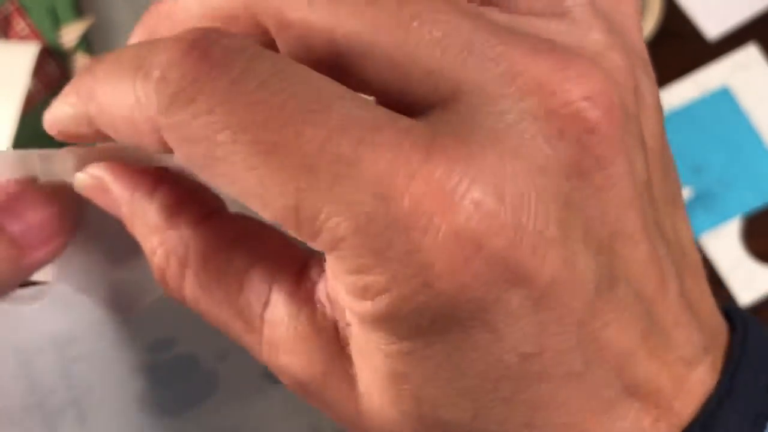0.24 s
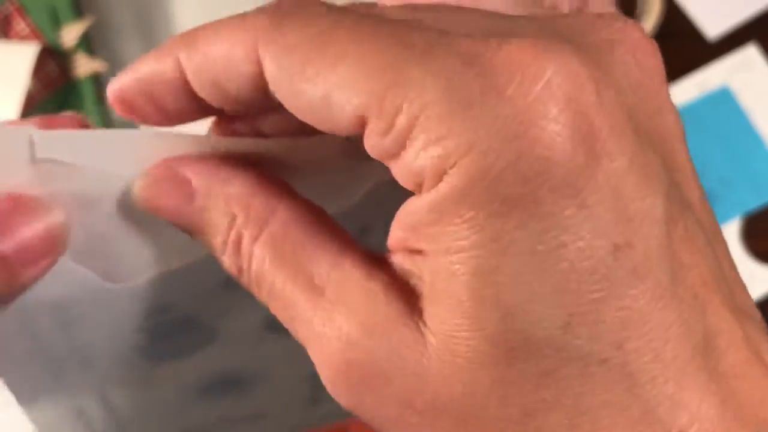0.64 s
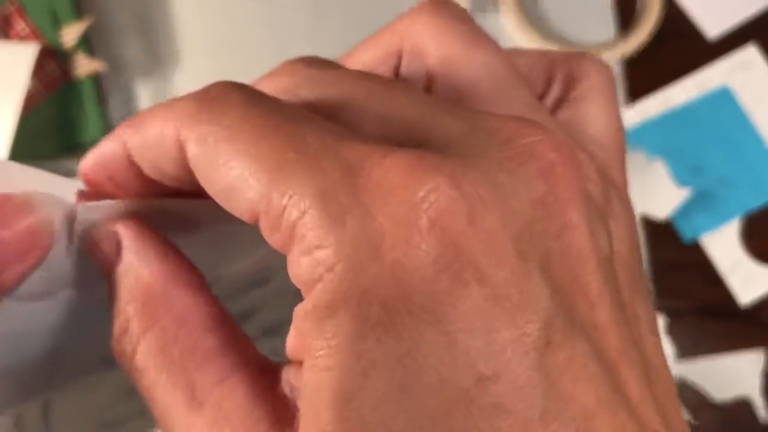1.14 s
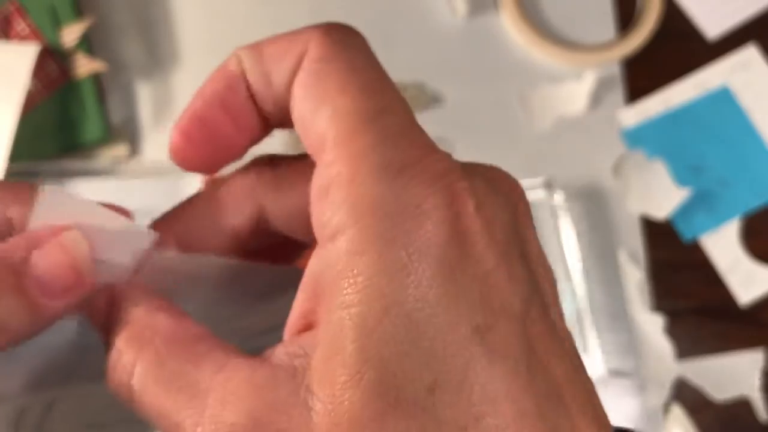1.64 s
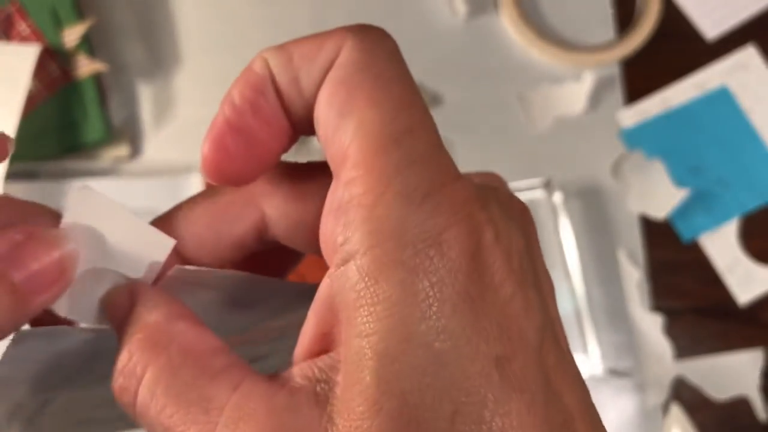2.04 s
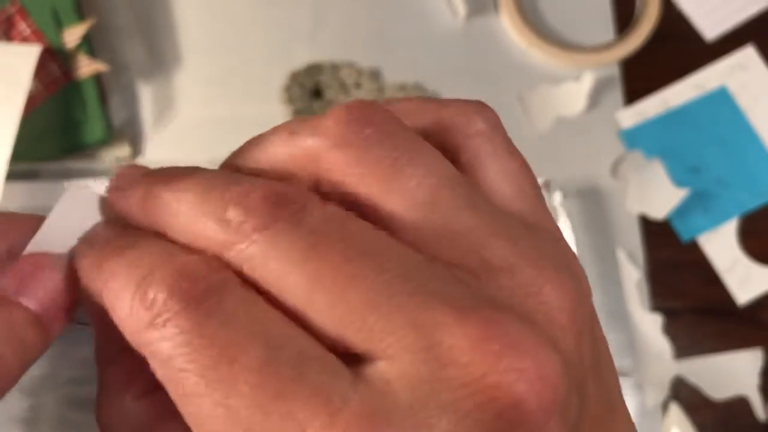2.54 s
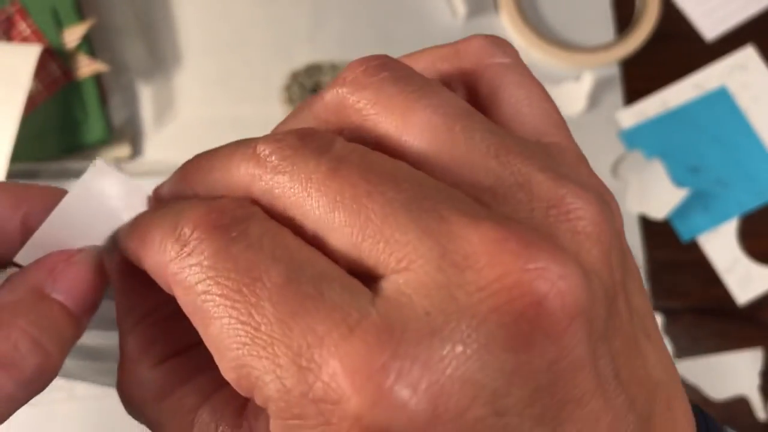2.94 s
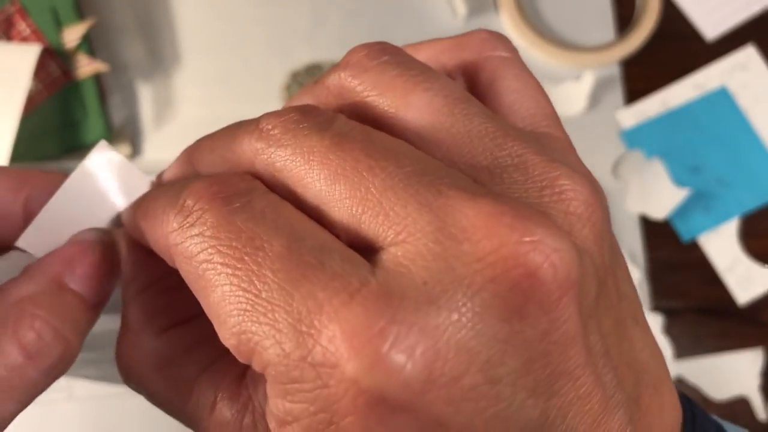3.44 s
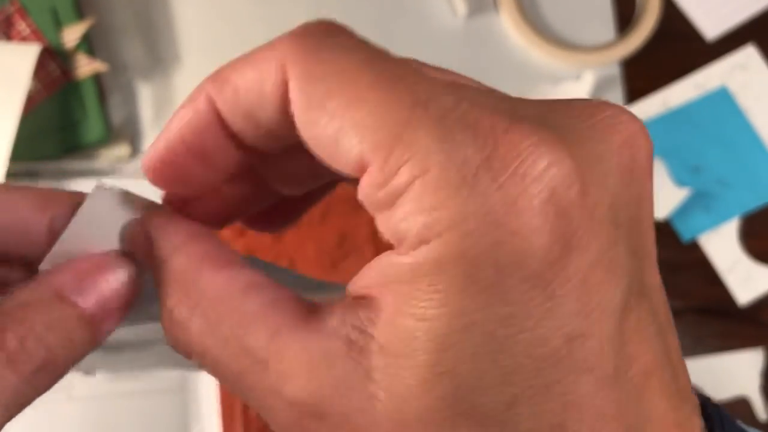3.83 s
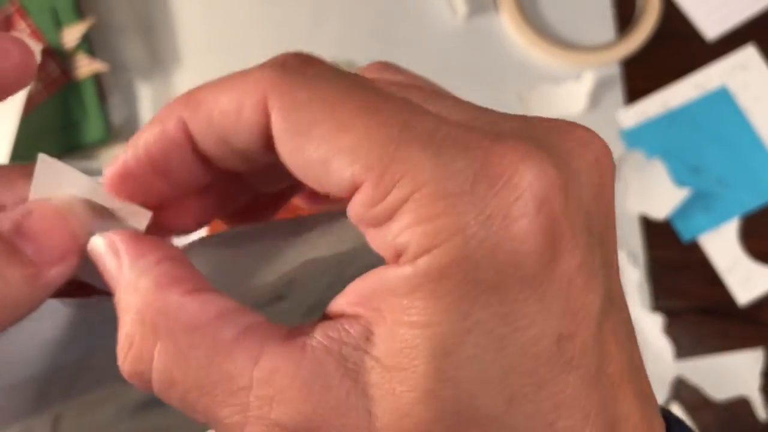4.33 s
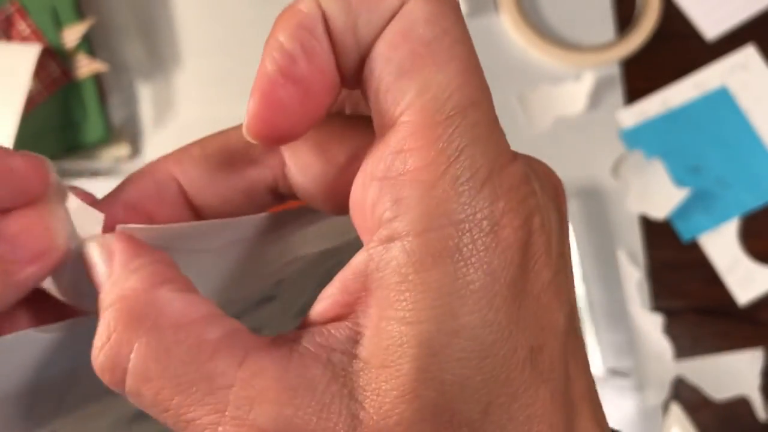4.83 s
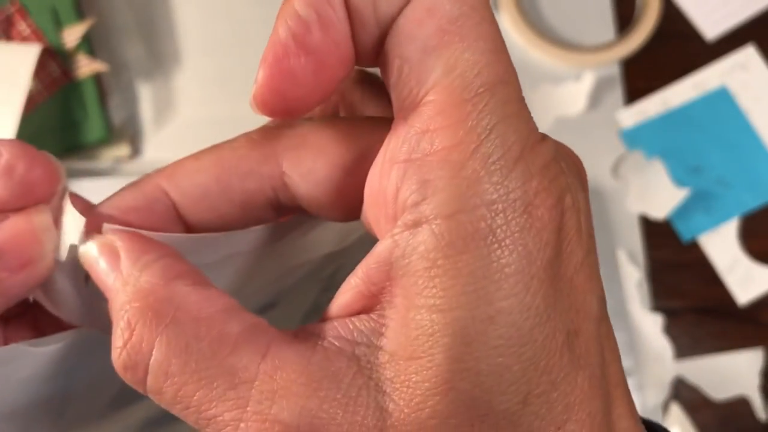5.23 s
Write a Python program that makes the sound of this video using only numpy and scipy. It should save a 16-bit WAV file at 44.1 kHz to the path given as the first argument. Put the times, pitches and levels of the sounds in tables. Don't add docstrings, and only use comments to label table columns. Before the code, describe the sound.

Close, dry clicks and light rustles of a small adhesive sheet being picked and creased, over dull table thuds and faint room hum.

```python
import sys
import numpy as np
from scipy import signal
from scipy.fft import rfft, irfft, next_fast_len
from scipy.io import wavfile
from scipy.ndimage import uniform_filter1d, map_coordinates

SR = 44100
rng = np.random.default_rng(int(sys.argv[2]) if len(sys.argv) > 2 else 0)


def invert_db(x):
    u = np.asarray(x, float) / 20
    return 10 ** u


def wav_record(signal):
    frames = np.transpose(np.atleast_2d(signal))
    bounded = np.clip(frames, -1, 1)
    quanta = np.round(bounded * 32767).astype(np.int16)
    wavfile.write(sys.argv[1], SR, quanta)


N = 241484


def unit(x):
    return x / np.sqrt(np.mean(x ** 2) + 1e-20)


def peak(x):
    return x / np.abs(x).max()


def along(points, hz):
    point_hz, value = np.transpose(points)
    return np.interp(np.log(hz + 1), np.log(point_hz + 1), value)


def over_time(rows):
    seconds, level_db = np.transpose(rows)
    return np.interp(np.arange(N) / SR, seconds, level_db)


def wobble(rate):
    knots = rng.standard_normal(int(N * rate / SR) + 4)
    return map_coordinates(knots, [np.arange(N) * rate / SR])


def filtered(x, response):
    n = x.shape[-1]
    size = next_fast_len(n + 8192)
    return irfft(rfft(x, size) * response(np.fft.rfftfreq(size, 1 / SR)), size)[..., :n]


def band(x, low_hz, high_hz):
    edges = [low_hz, min(high_hz, SR / 2.2)]
    return signal.sosfilt(signal.butter(2, edges, "band", fs=SR, output="sos"), x)


def below(x, top_hz):
    return filtered(x, lambda hz: .5 - .5 * np.tanh((hz - top_hz) / 70))


def noise(spectrum):
    return unit(filtered(rng.standard_normal(N), lambda hz: invert_db(along(spectrum, hz))))


# time in seconds, effort in dB.
STIRRING = [(0, -67.5), (.3, -60.5), (.91, -64.5), (1.16, -63.5), (1.5, -63.5), (1.8, -62), (2.24, -68),
            (3.3, -67), (4.47, -67), (4.73, -64.5), (5.48, -69)]
# frequency in Hz, level in dB per Hz.
TREMOR_COLOUR = [(12, -55), (20, -11), (27, -13.5), (48, 4.5), (70, 3.5), (91, -12), (110, 1), (140, -60),
                 (240, -120)]
# frequency in Hz, level in dB per Hz.
DRONE_COLOUR = [(53, -39), (90, -11.5), (121, -3.5), (151, -4), (198, -5), (216, -9.5), (386, -8.5),
                (412, -13.5), (764, -23.5), (900, -27), (1170, -59), (1980, -120)]
# frequency in Hz, level in dB per Hz.
HISS_COLOUR = [(290, -38), (500, 0.5), (2060, -9), (3730, -12), (4900, -16), (10400, -16), (12000, -15),
               (15800, -8)]
# pitch in Hz, level in dB.
APPLIANCE_TONES = [(119, -68), (190, -71), (382, -74.5)]


def background():
    effort_db = over_time(STIRRING)
    t = np.arange(N) / SR
    shaking = 0
    for start, bump_db, *_ in TABLE_BUMPS:
        since = np.maximum(t - start, 0)
        shaking = shaking + invert_db(bump_db - 60 * since / 2.7) ** 2 * np.minimum(since / 0.033, 1) ** 2
    rest_db = -59.5 + 0.091 * (effort_db - effort_db.mean())
    tremor_db = 10 * np.log10(invert_db(rest_db) ** 2 + invert_db(-48.5) ** 2 * shaking)
    drone_db = 10 * np.log10(invert_db(effort_db) ** 2 + invert_db(-61.5) ** 2 * shaking)
    tremor = invert_db(tremor_db + 1.4 * wobble(3.39)) * noise(TREMOR_COLOUR)
    drone = invert_db(drone_db + 1.2 * wobble(12)) * noise(DRONE_COLOUR)
    hum = 0
    for hz, db in APPLIANCE_TONES:
        hum = hum + invert_db(db + 3.3 * wobble(7)) * np.sin(2 * np.pi * hz * t + wobble(5.5))
    return tremor + drone + hum + invert_db(-69) * noise(HISS_COLOUR)


SHEET_ZONES = [(750, 1960), (2500, 7120), (7000, 14900)]


def zone_levels(db, bright_db, flank_db):
    held_db = 1.4 * min(bright_db, 0)
    return np.array([db + flank_db - bright_db, db, db + flank_db + bright_db + held_db])


# time in seconds, level in dB.
HANDLING = [(0, -71.5), (.15, -70.5), (.29, -68.5), (.62, -66), (.85, -63.5), (1.16, -71.5), (1.34, -66),
            (1.51, -68.5), (1.7, -61), (1.92, -69.5), (2.13, -71), (2.39, -76), (2.55, -70), (3.35, -78),
            (3.8, -70), (4.4, -70), (4.6, -66.5), (5.3, -76.5)]
# start in seconds, length in seconds, level in dB,
# brightness in dB.
NAIL_SCRAPES = [(0.218, 0.012, -58.5, -8.5), (0.594, 0.026, -55, 2.5), (.686, 0.02, -50, -3),
                (0.765, .048, -60.5, 0), (0.837, .04, -53.5, 3), (0.902, 0.042, -66, -6),
                (1.023, 0.04, -57.5, -1), (1.357, 0.049, -65.5, 6.5), (1.411, 0.022, -59.5, 3),
                (1.816, .014, -50, 10), (2.293, 0.096, -73.5, 6), (2.44, .11, -74, 11),
                (2.79, 0.055, -69, -6), (3.522, 0.025, -73.5, 8), (4.398, .042, -62, 0),
                (4.453, .045, -71, 5), (4.529, 0.077, -65, 2), (4.555, 0.15, -70.5, 5),
                (4.687, 0.074, -68, 2), (4.886, 0.085, -69, -4), (5.263, 0.02, -77, -9),
                (5.335, 0.023, -68, -6)]
# start in seconds, length in seconds, level in dB, brightness in dB.
SKIN_STROKES = [(0.094, 0.024, -68, -1), (0.242, 0.059, -66.5, -.5), (0.34, 0.071, -69.5, 0),
                (0.491, 0.1, -69, -5), (0.74, 0.043, -72, 7), (0.929, 0.0055, -55.5, -11),
                (0.96, .035, -68, -1), (1.083, 0.043, -67.5, 1), (1.5, 0.15, -68.5, 0.5),
                (1.644, 0.084, -71, 13.5), (1.728, 0.057, -59, 2), (1.79, .027, -68, 4),
                (1.83, 0.057, -66, 3.5), (1.914, 0.03, -69, -2), (2.39, 0.059, -70.5, 7.5),
                (2.602, 0.045, -68.5, 2), (2.651, 0.048, -64, 6.5), (3.039, 0.032, -66.5, -1.5),
                (3.752, 0.25, -80, 6), (4.157, 0.066, -71.5, 3.5)]


def rubbing():
    sheet_db = over_time(HANDLING)
    body_db = -73 + 0.87 * (sheet_db + 73)
    power = invert_db([body_db - 2.5, sheet_db - 4.5, sheet_db - 8.5]) ** 2
    passes = [(*row, -7.5) for row in NAIL_SCRAPES]
    passes += [(*row, 0) for row in SKIN_STROKES]
    for start, length, db, bright_db, flank_db in passes:
        zone_db = zone_levels(db, bright_db, flank_db)
        fade_db = -2 * np.linspace(-.5, .5, round(length * SR))
        power[:, round(start * SR):][:, :len(fade_db)] += invert_db(zone_db[:, None] + fade_db) ** 2
    level = np.sqrt(np.abs(uniform_filter1d(power, 220, axis=1)))

    clumps = invert_db(1.35 * wobble(60) + 0.62 * wobble(270))
    slip_size = invert_db(3.4 * np.minimum(rng.exponential(size=N), 4.5))
    slips = (rng.random(N) < 900 / SR) * slip_size * rng.choice([-1, 1], N)
    friction = clumps * (rng.standard_normal(N) + 0.42 * unit(slips))

    _, _, z = signal.stft(friction, nperseg=256)
    bending = uniform_filter1d(uniform_filter1d(rng.standard_normal(z.shape), 6, 0), 10, 1)
    friction = signal.istft(z * invert_db(2.1 * unit(bending)), nperseg=256)[1][:N]
    signs = (1, -1, 1)
    return sum(sign * g * unit(band(friction, *zone)) for sign, g, zone in zip(signs, level, SHEET_ZONES))


def snaps(events):
    out, t = np.zeros((2, N + 2048)), np.arange(2048) / SR
    for start, db, bright_db, flap_hz, flank_db, t60, sharp in events:
        body_db, middle_db, edge_db = zone_levels(db, bright_db, flank_db)
        zone_t60 = np.clip(t60, .003, .08) * np.array([[.95], [.95], [.8]])
        kick = 0.27 * rng.standard_normal((3, len(t))) * invert_db(-60 * t / zone_t60)
        kick[:, 0] += [sharp, -sharp, sharp]
        zones = [peak(band(k, *zone)) for k, zone in zip(kick, SHEET_ZONES)]

        home = int(flap_hz > SHEET_ZONES[0][1]) + int(flap_hz > SHEET_ZONES[2][0])
        centre = max(flap_hz, 1000)
        width = .21 * centre
        flap = filtered(zones[home], lambda f: 1j * f * width / (centre ** 2 - f ** 2 + 1j * f * width))
        zones[home] = peak(zones[home] + 1.15 * peak(flap))

        snap = invert_db(body_db) * zones[0] + invert_db(middle_db) * zones[1] + invert_db(edge_db) * zones[2]
        track = int(edge_db > -40)
        out[track, round(start * SR):][:len(t)] -= snap
    return out[:, :N]


# start in seconds, level in dB, brightness in dB,
# flap pitch in Hz.
GLUE_PEELS = [(0.2015, -55, -1, 1130), (0.5674, -45.5, -2.5, 1710), (0.6923, -40, 2, 2740),
              (0.707, -28.5, 4.5, 1050), (0.7156, -41, -2.5, 960), (0.7454, -46, 2.5, 930),
              (0.8352, -38.5, 2, 3550), (0.9294, -53, -5, 1770), (1.4626, -49, 14, 3320),
              (1.693, -27.5, 14, 12000), (1.711, -35.5, 8.5, 8800), (2.3601, -51.5, 5, 1700),
              (2.689, -56, 2, 1000), (2.7145, -61, 11, 970), (2.875, -63, 14, 1360),
              (2.902, -57.5, 16, 6200), (2.9064, -58.5, 15, 5710), (1.222, -65, -7, 1000),
              (5.405, -68, 10, 4000), (2.633, -60, 4, 1040), (3.1128, -56.5, 9.5, 6240),
              (3.5686, -66, 15.5, 3900), (3.6881, -54, -2, 1000), (3.7, -55, 8.5, 5820),
              (3.856, -40.5, 12.5, 9400), (4.792, -65, 11, 6000), (4.988, -49.5, 4, 3600),
              (5.0353, -49.5, 4, 2180), (5.457, -46.5, 8, 4570)]
# start in seconds, level in dB,
# brightness in dB, flap pitch in Hz.
CREASE_FLIPS = [(.057, -31, 0, 3450), (0.543, -45.5, -3, 1870), (0.6116, -45, 11, 2690),
                (0.7084, -26, 1, 1540), (0.7363, -40, 4, 1000), (0.9562, -21, 0, 5100),
                (1.0185, -41.5, 5, 3780), (1.026, -42.5, 10, 3620), (1.036, -44.5, 9, 3780),
                (1.2007, -33.5, 12.5, 3750), (1.512, -45, -2, 2890), (1.7212, -19.5, 4.5, 2940),
                (1.76, -37, 1, 4400), (1.7662, -33.5, 10, 3780), (1.818, -35.5, 13.5, 4270),
                (1.9325, -48, -11, 990), (1.915, -57, -8, 1000), (2.391, -49.5, 1, 3840),
                (2.3973, -48, 9, 5830), (2.606, -45.5, 2, 2860), (2.791, -48, 19, 6800),
                (4.1284, -52.5, -4, 1110), (4.1395, -44.5, 6, 1030), (4.412, -41.5, 0.5, 1110),
                (4.6607, -43, 6, 3740), (4.6819, -35.5, 0, 1700), (4.4545, -53, -3, 3940),
                (4.894, -50, 2, 3000), (5.3539, -51, -3, 2065), (5.359, -50, 2, 2190)]
# start in seconds, level in dB,
# brightness in dB, flap pitch in Hz.
NAIL_PICKS = [(.1529, -40, 3.5, 3060), (0.213, -47, 4, 4490), (0.223, -36, 0, 1250), (0.686, -46, 6, 1510),
              (.816, -25, -3, 3650), (.826, -39, 4, 4510), (0.9261, -34.5, -8, 2870),
              (1.0435, -40.5, -11, 990), (1.274, -35.5, -3, 2600), (1.4103, -44.5, 13, 2840),
              (1.43, -48, 7, 3730), (1.4408, -49, 12, 3700), (1.4869, -15, 16.5, 5400),
              (1.4931, -23.5, 19.5, 2930), (1.498, -37, 1, 2800), (1.651, -44.5, 10, 3690),
              (1.703, -27.5, 18.5, 7200), (1.8216, -40, 16, 4680), (1.9838, -40.5, -6.5, 1000),
              (2.0605, -22, -1, 1980), (3.1916, -31, 17, 5670), (3.503, -51, -8, 3600),
              (4.0274, -45, -12, 3040), (4.4146, -32, 3, 6400), (4.421, -40, 4, 4270),
              (4.4434, -48, 8, 4040), (4.498, -43.5, -3, 3090), (4.51, -44.5, 16, 4000),
              (4.548, -29, -1.5, 2220), (4.566, -32.5, -3, 1610)]
# body and edge over the middle in dB,
# time to fade by 60 dB in seconds, sharpness of the first kick (no unit).
SNAP_MANNERS = [
    (3.5, 0.022, 1.7),
    (-4, 0.021, 1.7),
    (-8.5, 0.02, 2.03),
]
# start in seconds, peak in dB.
GLUE_TICKS = [(0.4144, -56), (2.2344, -67.5), (2.3326, -56), (2.7422, -56), (2.8004, -55), (2.823, -54),
              (2.8394, -57), (2.9472, -58), (3.1527, -58), (3.3244, -67), (3.3563, -60.5), (3.5614, -55),
              (3.7194, -54), (3.927, -54), (4.0178, -61), (4.0644, -67), (4.2944, -67), (4.3804, -58),
              (4.4324, -47)]


def main_snaps():
    events = []
    for rows, manner in zip((GLUE_PEELS, CREASE_FLIPS, NAIL_PICKS), SNAP_MANNERS):
        events += [(*row, *manner) for row in rows]
    # brightness 12.5 dB, pitch 6000 Hz, flanks -1 dB, fade 0.009 s, sharpness 1.4
    events += [(start, db - 8.5, 12.5, 6000, -1, .009, 1.4) for start, db in GLUE_TICKS]
    return snaps(events)


# frequency in Hz, time to fade by 60 dB in seconds.
ROOM_FADE = [(500, 0.48), (2000, 0.11), (6000, 0.14), (15000, 0.073)]


def room(x):
    out, step = np.zeros(N + SR), SR // 4
    for start in range(0, N, step):
        hz, t, z = signal.stft(rng.standard_normal(SR // 4), SR, nperseg=256)
        fade = invert_db(-60 * t / along(ROOM_FADE, hz)[:, None])
        tail = signal.istft(z * fade, SR, nperseg=256)[1]
        wet = signal.fftconvolve(x[start:start + step], tail / np.linalg.norm(tail))
        out[start + 130:][:len(wet)] += wet
    return out[:N]


# start in seconds, peak in dB, pitch in Hz,
# time to fade by 60 dB in seconds.
SPAN_RINGS = [(.0572, -39, 1660, 0.023), (.709, -43.5, 135, 0.081), (.7085, -44, 926, .04),
              (.7085, -36, 1530, .03), (.8162, -26.5, 1020, 0.023), (.8162, -33, 1810, 0.024),
              (.8355, -42, 990, 0.057), (.9268, -38, 1785, 0.039), (.9268, -36.5, 2960, 0.022),
              (.9565, -28, 1530, 0.022), (0.9562, -33, 1250, 0.024), (0.9574, -34, 3050, .015),
              (.9565, -32, 3900, .012), (.9565, -32, 6600, .012), (.9565, -32.5, 2250, .02),
              (1.029, -43.5, 600, .02), (1.0435, -45, 950, 0.036), (1.2015, -43, 2300, 0.018),
              (1.7215, -33.5, 3130, .022), (1.765, -43, 3760, .03), (2.0608, -25.5, 1840, 0.027),
              (2.0604, -28, 2140, 0.019), (3.192, -45.5, 5500, .03), (3.857, -55, 9500, .04),
              (1.2017, -39.5, 3000, 0.016), (1.7216, -34, 1180, 0.019), (1.463, -52, 3300, .015),
              (1.984, -43, 960, 0.022), (4.028, -47, 4000, 0.012), (5.4572, -54, 4740, .015),
              (5.4572, -59, 6600, .015), (4.5482, -38, 2260, 0.016), (1.068, -53, 450, .02),
              (1.787, -48, 520, .02), (1.9328, -52, 2550, .015), (.0572, -52, 2100, .012),
              (1.693, -39, 4100, .015)]
# start in seconds, length in seconds, level in dB,
# pitch in Hz, width as a share of the pitch.
SKIN_WHISTLES = [(0.369, 0.22, -68.5, 1780, 0.12), (.57, .14, -68.5, 1670, .08),
                 (0.769, .022, -61.5, 2900, 0.092), (.807, 0.0084, -58, 3580, .2),
                 (.845, 0.029, -57, 3750, .15), (0.84, .032, -58, 6700, .12), (.9, .025, -66, 4300, .2),
                 (1.089, 0.21, -71.5, 1590, .06), (1.045, .018, -62, 5500, 0.18),
                 (1.724, .016, -58, 3000, .15), (2.29, .03, -76, 4600, .08), (2.43, 0.14, -70, 6550, 0.27),
                 (4.538, .024, -56.5, 5840, .06), (4.688, 0.086, -69.5, 3770, .1),
                 (4.9, 0.062, -71, 3400, 0.17), (4.92, .06, -75, 4200, .08), (5.07, .02, -75, 2920, 0.045),
                 (5.264, .022, -72.5, 4000, .3), (5.342, .028, -68, 3100, .1), (0.239, .16, -68, 520, .9),
                 (3.029, .05, -69, 750, 0.69), (5.125, 0.031, -72, 3000, .5)]


def singing():
    out, t = np.zeros(N + SR), np.arange(4096) / SR
    for start, db, hz, t60 in SPAN_RINGS:
        tone = invert_db(db - 60 * t / max(t60, .004)) * np.sin(2 * np.pi * hz * t)
        out[round(start * SR):][:len(t)] -= tone
    for start, length, db, hz, width in SKIN_WHISTLES:
        spread = 1 + max(width, .02) / 2
        drag = unit(band(rng.standard_normal(SR // 4), hz / spread, hz * spread))[:round(length * SR)]
        out[round(start * SR):][:len(drag)] += invert_db(db) * signal.windows.tukey(len(drag), .4) * drag
    return out[:N]


# start in seconds, peak in dB,
# pitch in Hz, time to fade by 60 dB in seconds, spread as a frequency ratio.
FINGER_KNOCKS = [(.226, -52.5, 394, 0.037, 1.5), (0.708, -37, 395, 0.03, 1.28),
                 (0.716, -41, 196, 0.055, 2.2), (.816, -40, 500, 0.012, 1.29),
                 (.927, -42.5, 535, 0.027, 1.27), (0.955, -38.5, 510, 0.035, 1.32),
                 (1.043, -43, 490, 0.039, 1.33), (1.223, -51.5, 654, 0.012, 1.26),
                 (1.721, -46, 495, 0.029, 1.8), (1.7213, -36, 3150, 0.018, 1.44),
                 (1.984, -39, 950, 0.022, 1.26), (2.06, -41.5, 600, 0.022, 2.1),
                 (2.0623, -31, 1920, 0.012, 1.17), (2.064, -40, 1900, 0.18, 1.37),
                 (2.449, -49.5, 786, 0.14, 1.7), (2.456, -45.5, 295, 0.053, 1.08),
                 (2.712, -41.5, 646, 0.016, 1.56), (3.688, -50, 696, 0.045, 1.37),
                 (4.028, -46, 597, 0.028, 2), (4.568, -43.5, 507, 0.031, 1.8),
                 (4.682, -40, 493, 0.011, 2.5)]


def knocks():
    out, t = np.zeros(N + 8192), np.arange(8192) / SR
    for start, db, hz, t60, spread in FINGER_KNOCKS:
        puff = rng.standard_normal(len(t)) * invert_db(-60 * t / t60)
        spread = max(spread, 1.05)
        out[round(start * SR):][:len(t)] += invert_db(db) * peak(band(puff, hz / spread, hz * spread))
    return out[:N]


# start in seconds, level in dB, brightness in dB,
# flap pitch in Hz.
SMALL_CRACKS = [(.7097, -32, 8, 9500), (0.716, -40, 8, 7200), (.7545, -54, 5, 4000), (.774, -52, 4, 2900),
                (.9305, -45, -4, 3000), (.992, -58, 8, 6000), (1.0895, -54, 6, 3400),
                (1.192, -56, -4, 3500), (1.2028, -36, 11, 5170), (1.204, -38, 8, 6500),
                (1.4235, -49, 4, 3000), (1.436, -50, 10, 3700), (1.4597, -56, 10, 6000),
                (1.481, -53, 10, 6000), (1.498, -40, 14, 12500), (1.6915, -40, 17, 12000),
                (1.6955, -32, 12, 12500), (1.7047, -38, 12, 13000), (1.8245, -43, 12, 6000),
                (1.827, -44, 14, 11000), (1.9828, -42, 5, 6270), (2.027, -65, 14, 11000),
                (2.13, -60, 14, 12000), (2.797, -49, 8, 7500), (2.686, -60, 10, 12000),
                (3.044, -60, 4, 5000), (4.5675, -38, 2, 5500), (4.8698, -58, 0, 2860),
                (5.058, -62, 2, 4000), (5.277, -64, 0, 3500), (1.142, -59, -2, 3800),
                (3.972, -68, 14, 12000), (3.987, -68, 14, 13000), (4.998, -64, 14, 12500),
                (5.106, -62, 14, 12500), (5.203, -65, 14, 12000), (.782, -54, 2, 5300),
                (.8465, -50, 6, 5000), (.857, -50, 6, 7000), (.868, -50, 6, 4000), (4.428, -54, 6, 6000),
                (4.709, -58, 6, 6500)]
# body and edge over the middle in dB, time to fade by 60 dB in seconds,
# sharpness of the first kick (no unit).
CRACK_MANNER = (-8.5, 0.013, 1.6)


def small_cracks():
    return snaps([(*row, *CRACK_MANNER) for row in SMALL_CRACKS])


# start in seconds, strength in dB, rattle level in dB,
# time for the rattle to fade by 60 dB in seconds.
TABLE_BUMPS = [
    (1.343, -3.5, -50, 0.25),
    (1.9324, -7.5, -51.5, 0.21),
    (2.4425, 0.5, -53, 0.37),
    (2.9434, -9.5, -58, 0.42),
    (3.61, -9.5, -54.5, 0.1),
    (3.641, -12, -52, 0.29),
    (4.195, -24.5, -82, 0.16),
    (1.456, -18.5, -72, 0.14),
    (2.035, -23, -72, .15),
    (2.571, -26, -70, 0.13),
]
# pitch in Hz, level in dB, time to fade by 60 dB in seconds.
TABLE_TONES = [(44.2, -11, .19), (57.1, -4.8, .19), (70.1, -17, .24)]


def bumps():
    out, t = np.zeros(N + SR), np.arange(SR // 2) / SR
    push = (1 - np.exp(-t / .05)) ** 2
    boom = 0
    for k, (hz, db, t60) in enumerate(TABLE_TONES):
        boom = boom + (-1) ** (k + 1) * invert_db(db - 60 * t / t60) * np.sin(2 * np.pi * hz * t)
    for start, db, rattle_db, rattle_t60 in TABLE_BUMPS:
        rattle = unit(band(rng.standard_normal(len(t)), 90, 183))
        rattle = rattle * invert_db(rattle_db + 8 - 60 * t / rattle_t60) * (1 - np.exp(-t / 0.009)) ** 2
        out[round(start * SR):][:len(t)] += invert_db(db) * push * boom + rattle
    return out[:N]


def scene():
    dull, bright = main_snaps()
    dull_cracks, bright_cracks = small_cracks()
    echo = invert_db(-19.5) * room(dull + bright)
    steady = background() + rubbing() + dull + echo + singing() + knocks() + dull_cracks + bumps()
    return (below(bright + bright_cracks, 16950) + below(steady, 15950))[None]


# frequency in Hz, level in dB.
MICROPHONE_COLOUR = [(500, -0.5), (620, -1), (770, -5), (950, -1), (1200, -2), (1400, -4), (1700, -2.5),
                     (3000, -1), (6000, -2.5), (7600, -4), (9200, -1.5), (10600, -5), (12500, -1),
                     (15500, -5.5)]


def microphone(x):
    return filtered(x, lambda hz: invert_db(along(MICROPHONE_COLOUR, hz)))


def roll_off(x):
    return signal.sosfilt(signal.butter(12, 17030, fs=SR, output="sos"), x)


def record(dry):
    mix = microphone(dry)
    return roll_off(mix)


dry = scene()
out = record(dry)
wav_record(out)
```